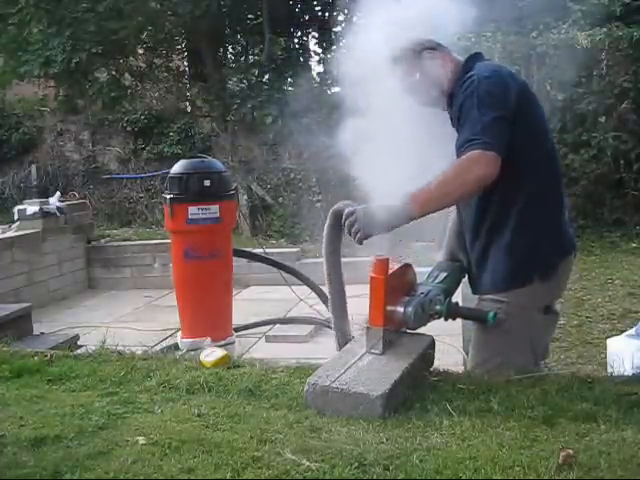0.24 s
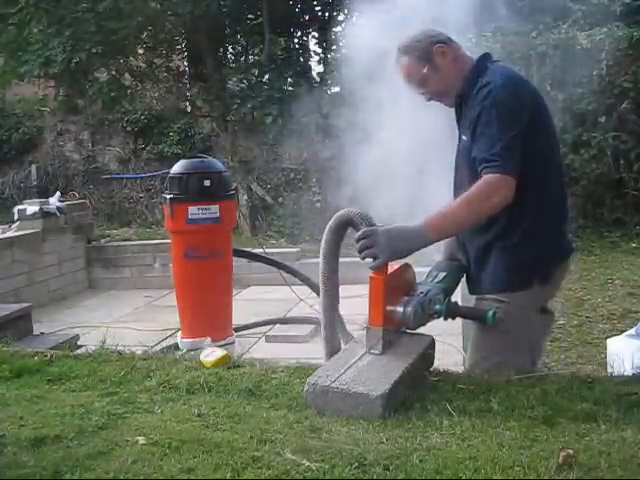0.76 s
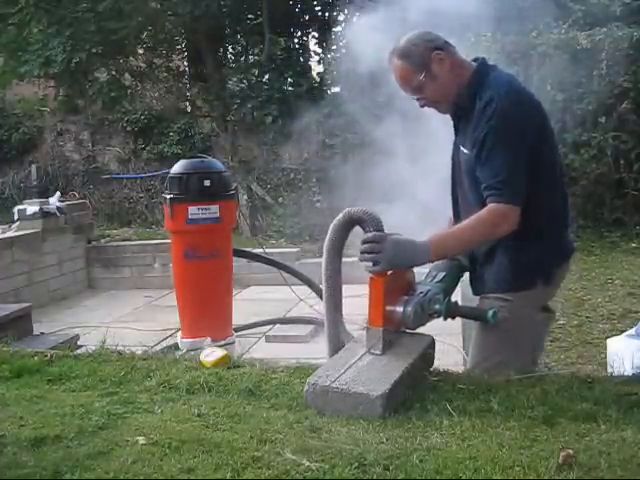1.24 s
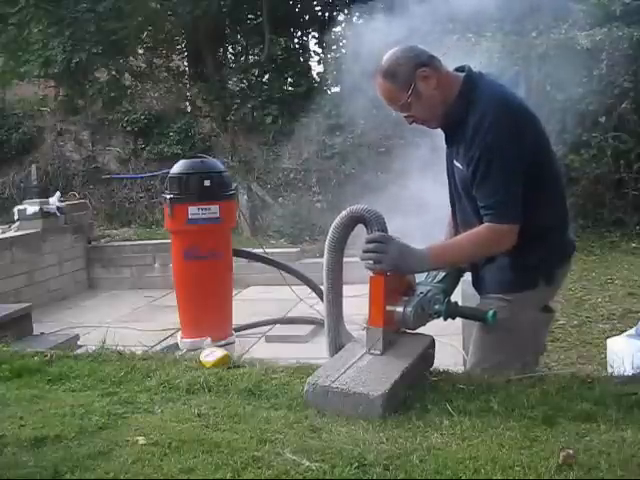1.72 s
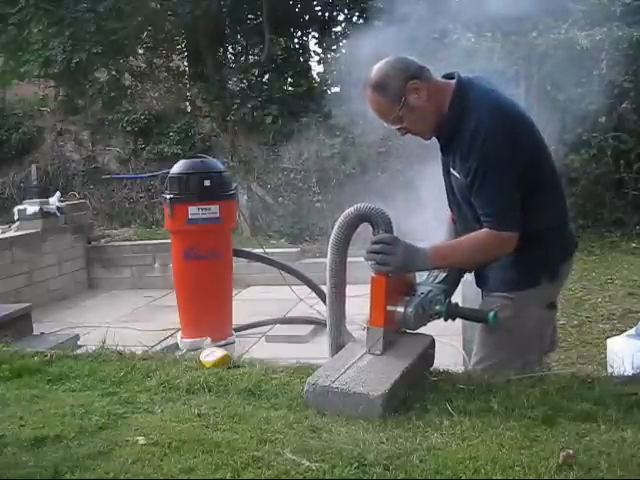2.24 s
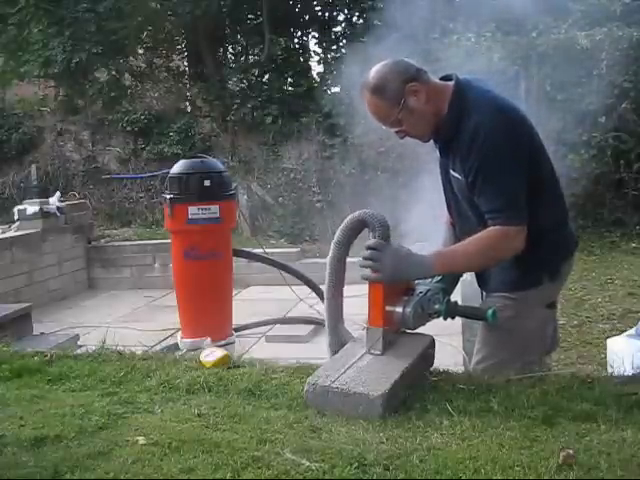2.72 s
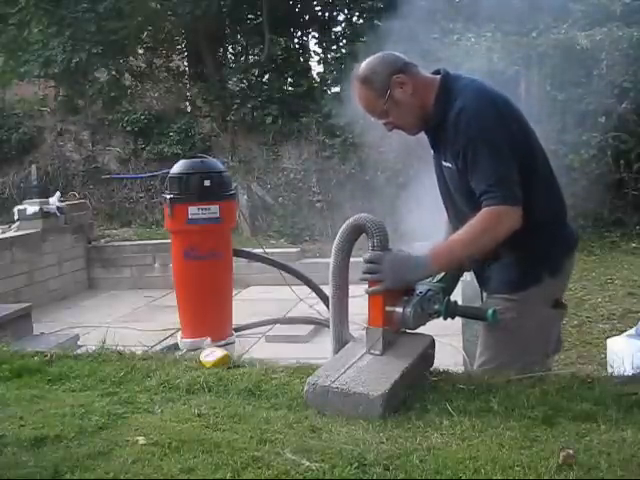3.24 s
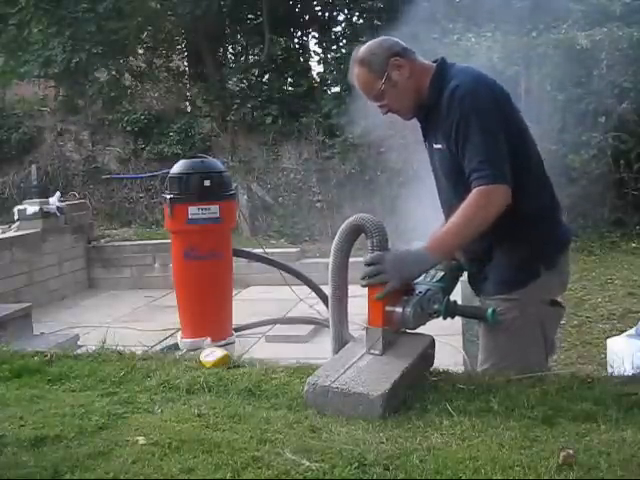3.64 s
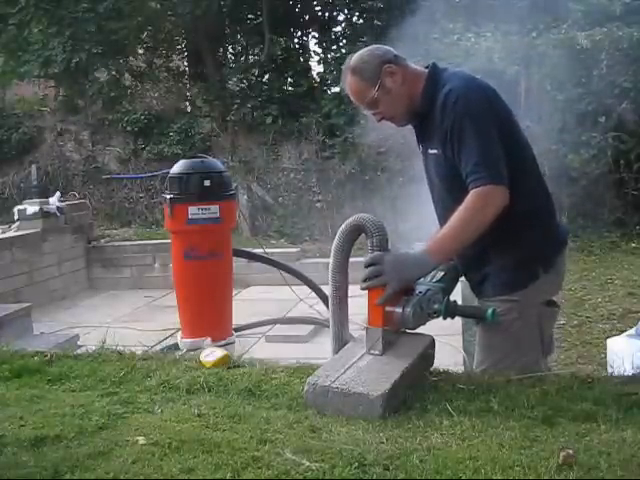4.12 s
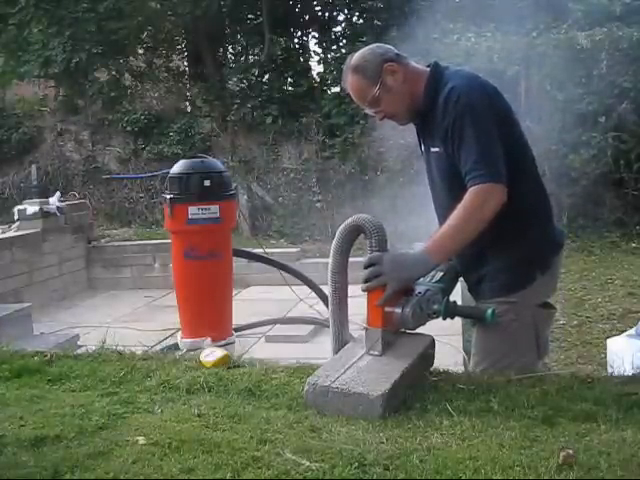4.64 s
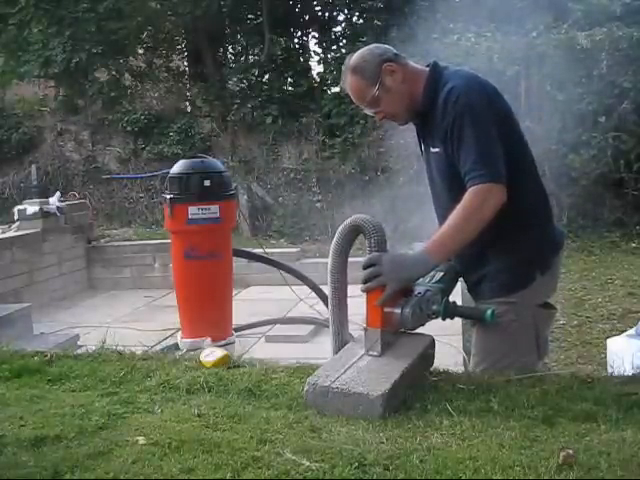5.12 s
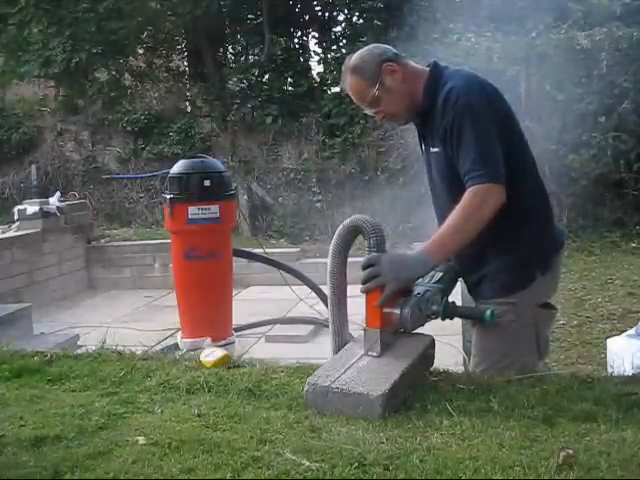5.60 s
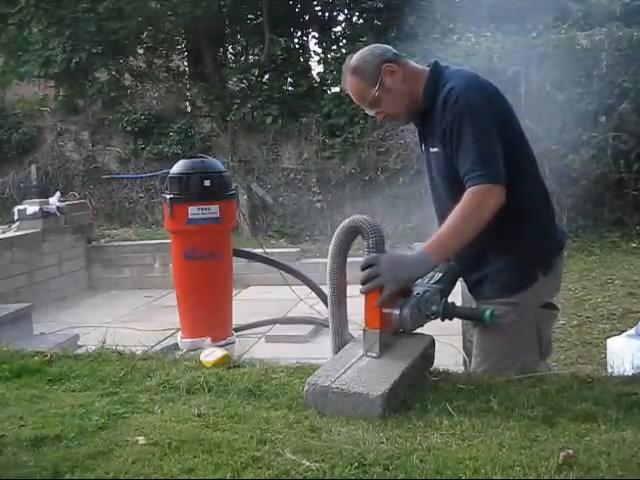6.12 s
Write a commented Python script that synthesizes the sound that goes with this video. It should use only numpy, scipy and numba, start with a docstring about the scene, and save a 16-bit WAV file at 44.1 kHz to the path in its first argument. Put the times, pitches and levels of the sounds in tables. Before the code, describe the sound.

Steady, piercing abrasive grinding of a diamond disc in concrete, with ringing steel, a climbing then sagging motor pitch and faint extractor air rush.

```python
"""In a garden, an angle grinder with a diamond blade cuts a concrete block, a dust extractor on its guard.
Filtered noise is the scraped grit; noise-driven resonators are the steel disc, whose modes shift as the
motor gains speed and bogs down again, and three of them squeal. Sines on one shaft make the motor's hum,
fan tone and whine. Air rushes through the guard while the hose is pushed on; a faint rumble lies below.
One mono camera microphone hears it all."""
import sys
import numpy as np
from scipy import signal
from scipy.fft import rfft, irfft, next_fast_len
from scipy.io import wavfile
from scipy.ndimage import uniform_filter1d
from numba import njit

SR = 44100
rng = np.random.default_rng(int(sys.argv[2]) if len(sys.argv) > 2 else 0)


def wav_record(signal):
    """Record a signal, one row per channel, as 16-bit PCM in the file named by sys.argv[1]."""
    frames = np.transpose(np.atleast_2d(signal))
    bounded = np.clip(frames, -1, 1)
    # unit amplitude maps onto the largest positive 16-bit level
    quanta = np.round(bounded * 32767).astype(np.int16)
    wavfile.write(sys.argv[1], SR, quanta)


N = 280476

# disc modes; waves running with the spin rise, those against it fall: full_speed_hz,
# shift_hz_per_motor_hz, width_hz (before the damping factor), full_speed_db, labouring_db
DISC_MODES = [(2610, .8, 50, -41, -41), (2860, .5, 26, -38, -40), (2995, .1, 150, -35, -33),
              (3285, 1.5, 22, -41, -43), (3620, 1.1, 90, -34.5, -36), (3866, 1.5, 24, -39.5, -38),
              (4318, .6, 95, -31, -32), (4567, 1.9, 20, -37, -39), (4680, .3, 35, -39, -41),
              (4875, .6, 28, -42, -44), (5700, .6, 50, -43, -41), (5840, 1.6, 28, -40, -37),
              (6326, 1.4, 30, -38, -38), (6490, 2, 24, -46, -40), (7350, 2.6, 28, -44, -41),
              (8729, .8, 390, -37, -38), (9314, 2.1, 45, -41, -37), (9640, -2, 45, -40, -39),
              (9910, 2.5, 40, -38, -36), (10776, 1, 50, -38, -42), (11190, 3.2, 80, -39, -37),
              (11822, -1.9, 50, -41, -38), (12132, -2.9, 300, -39, -35), (12823, 1.9, 30, -45, -42),
              (13122, .1, 45, -41, -52), (13553, .8, 370, -35, -36), (14515, 1.7, 40, -41, -35),
              (14897, -2, 80, -38, -41), (15211, 2, 80, -40, -37)]
# the three disc modes that the cut pumps hardest: full_speed_hz, shift_hz_per_motor_hz, width_hz
SQUEALING_MODES = [(5068, 1.4, 24), (5257, 1.3, 20), (6160, 1.1, 22)]
# strength of those modes, before SQUEAL_OFFSET_DB: level_db, extra_db while the disc rubs,
# extra_db while the dust port is open, slope_db_per_s
SQUEAL_STRENGTHS = [(-32.5, 5, -10, -0.74), (-37, 2, 5, 0), (-31.5, 1, 1, 0.07)]
SQUEAL_OFFSET_DB = -1.5
# the blade catches in the slot and the squeal changes: peak_s, lower_pair_change_db, upper_mode_change_db
BLADE_CATCHES = [(.06, 8, -1), (.94, -2, 3.5), (1.17, 2, 5), (2.27, 4, 1.5), (2.37, 5.5, 2), (2.58, 5, 6.5),
                 (4.08, 5.5, 1), (4.6, -3, 7), (5.109, -1, 7.5), (5.35, 3, 2)]
CATCH_HALF_S = .04  # from the peak to 1/e of it
# the side of the disc rubs the slot wall through the middle of the cut
RUB_FROM_S, RUB_TO_S, RUB_FADE_S = 1.67, 4.5, .35

# level of the coarse scraping: time_s, level_db (before COARSE_OFFSET_DB)
SCRAPING_LEVEL = [(0, -25), (0.65, -22), (1.3, -29), (1.75, -26.5), (3.05, -28.5), (3.35, -24),
                  (4.4, -25.5), (4.85, -27.0), (6.35, -26.5)]
COARSE_OFFSET_DB = -7
# spectra of crushed concrete, coarse and fine: frequency_hz, relative_db
COARSE_SPECTRUM = [(150, -59), (700, -51), (1000, -12.5), (1330, -17), (1500, -6), (1850, -10), (2200, -2),
                   (2700, -4), (3300, -7.5), (4700, -10.5), (5450, -18), (7000, -25)]
FINE_SPECTRUM = [(1000, -53), (4500, 6), (5600, 1), (6600, 5), (7400, 2.5), (8500, 1), (10200, 0),
                 (13000, 2.5), (15400, 1.5)]
FINE_DB, FINE_LOAD_DB = -25.5, -0.1  # the fine hiss falls very slightly under load
# reflections off the garden walls: delay_s, level_db
WALL_ECHOES = [(.0137, -15), (.0262, -15), (.0411, -17)]

# the motor picks up, runs free and bogs down: time_s, speed_hz, once_a_turn_hum_db
MOTOR_COURSE = [(0, 266, -76), (0.3, 283.8, -63), (0.6, 294.3, -59), (0.95, 306, -51), (1.17, 314.1, -70),
                (1.5, 323.2, -65.2), (2, 330.5, -60), (2.5, 336.6, -57), (3.5, 340.4, -53),
                (4.5, 333, -57.5), (4.85, 311.9, -55), (5.2, 298, -53.8), (5.6, 286.5, -55.1),
                (6.36, 277.3, -61.5)]
FULL_HZ, SAG_HZ = 340, 60  # free motor speed, and its fall at load 1
FAN_BLADES, BLADE_SEGMENTS = 11, 16
GEAR_RATIO = 4.09  # motor turns per blade turn
# the cooling fan sings while the motor picks up
FAN_DB, FAN_SWELL_DB, FAN_PEAK_S, FAN_SWELL_S = -48, 7, 1.1, 0.68
# the whine flares as the blade binds in the slot and drags the motor down
WHINE_DB, BIND_DB, BIND_PEAK_S, BIND_SWELL_S = -56, 15, 5.21, .4

# fixed resonances of the dust guard: frequency_hz, width_hz, level_db (before the stirring gain)
GUARD_MODES = [(1622, 75, -40), (2060, 120, -42), (2300, 120, -41)]
GUARD_DB, GUARD_DB_PER_S = 0.5, -0.5  # the ring fades as the blade sinks into the slot
# the guard's lowest resonance rises and falls in level: time_s, level_db
HOWL_LEVEL = [(0, -55), (.4, -41.5), (1.1, -47), (2.3, -50), (3.8, -42), (4.6, -45.5), (5.2, -48.5),
              (6.36, -46)]
HOWL_HZ, HOWL_WIDTH_HZ = 1190, 45

# air drawn through the guard: frequency_hz, relative_db
AIR_SPECTRUM = [(40, -42), (120, -22.5), (190, -14.5), (250, -16), (310, -4), (400, -2.5), (600, 0),
                (700, 3), (830, 0), (1000, 0.5), (1300, -11.5), (2500, -16.5)]
AIR_DB, AIR_DB_PER_S = -46, -.45  # the rush fades as the blade sinks into the slot
# resonances of the hose mouth: frequency_hz, width_hz, relative_db
HOSE_MODES = [(298, 16, -6), (385, 34, -3), (440, 25, -6), (535, 18, -2), (690, 20, -6), (925, 34, 2)]
HOOT_DB, HOOT_DB_PER_S = -53.5, -0.4
# the hose hoots as it nears the open port: extra level, and how long the approach lasts
OPEN_HOOT_DB, APPROACH_S = 7, .9
# the hose is pushed onto the guard: when, and how long it takes to seal
SEATED_S, SEAL_S = 1.11, 0.087

# faint outdoor rumble: frequency_hz, relative_db
RUMBLE_SPECTRUM = [(25, 2.5), (50, 1), (78, 2), (110, 0.5), (220, 1), (800, -25)]
NOTCH_HZ, TOP_HZ = 7880, 15420  # the camera's treble notch and upper limit


def undb(db):
    """Level to amplitude: 20 dB is a factor of ten."""
    return 10 ** (np.asarray(db) / 20)


def unit(x):
    """Normalization to rms 1."""
    return x / np.sqrt(np.mean(x ** 2))


def seconds():
    """Sampling: the time of each sample."""
    return np.arange(N) / SR


def curves(table):
    """Linear interpolation of each column of a time table."""
    s, *columns = np.transpose(table)
    return [np.interp(seconds(), s, c) for c in columns]


def swell(peak_s, half_s):
    """Gaussian envelope: a bell-shaped rise and fall, 0 to 1."""
    return np.exp(-((seconds() - peak_s) / half_s) ** 2)


def noise():
    """White noise: equal power at every frequency."""
    return rng.standard_normal(N)


def walk(rate):
    """Random modulation: straight lines join `rate` random values a second, spread near 1."""
    knots = rng.standard_normal(1024)
    return 1.2 * np.interp(seconds() * rate, np.arange(len(knots)), knots)


def colour(x, spectrum):
    """Spectral filtering by a frequency-to-level curve; rms 1."""
    hz, db = np.transpose(spectrum)
    size = next_fast_len(N)
    f = np.maximum(np.arange(size // 2 + 1) * SR / size, 1)
    gain = undb(np.interp(np.log(f), np.log(hz), db))
    return unit(irfft(rfft(x, size) * gain, size)[:N])


@njit
def resonator(x, hz, width):
    """Damped oscillation of a mode whose pitch may move; read as velocity, so it has no bass."""
    y, state, step = np.empty(len(x)), 0j, 0j
    for i in range(len(x)):
        if i % 16 == 0:
            step = np.exp((2j * hz[i] - width) * np.pi / SR)
        state = state * step + x[i]
        y[i] = state.real - x[i] / 2
    return y


def ring(drive, hz, width):
    """Forced resonance: a random force of its own, of the given strength, shakes one mode; rms 1."""
    force = drive * rng.uniform(-1, 1, N)
    return unit(resonator(force, hz + np.zeros(N), float(abs(width))))


def cavity(modes, drive):
    """Cavity resonance: grit or air stirs a set of fixed modes."""
    return sum(undb(db) * ring(drive, hz, width) for hz, width, db in modes)


def load(speed):
    """Speed sag under torque: 0 when the motor runs free, 1 when it is SAG_HZ slower."""
    return (FULL_HZ - speed) / SAG_HZ


def contact(speed, wobble=0.08, chatter_db=.5):
    """Contact force: the blade presses harder once a turn and chatters in the slot."""
    turn = 2 * np.pi * np.cumsum(speed / GEAR_RATIO) / SR
    return (1 + wobble * np.sin(turn)) * undb(chatter_db * walk(35))


def disc(speed, press, flicker_db=1.0, damping=0.81):
    """Rotating-plate vibration: modes follow the spin, and trade strength as the load changes."""
    sag_hz = FULL_HZ - speed
    out = 0
    for hz, slope, width, free_db, loaded_db in DISC_MODES:
        db = free_db + (loaded_db - free_db) * load(speed) + flicker_db * walk(12)
        out = out + undb(db) * ring(press, hz - slope * sag_hz, damping * width)
    return out


def rubbing():
    """Side friction: 1 while the disc rubs the slot wall, else 0, with short fades."""
    t = seconds()
    return np.clip(.5 + np.minimum(t - RUB_FROM_S, RUB_TO_S - t) / RUB_FADE_S, 0, 1)


def port_open():
    """Port closure: 1 while the guard's dust port is open, 0 once the hose is seated."""
    return np.clip(.5 + (SEATED_S - seconds()) / SEAL_S, 0, 1)


def squeal(speed, press, saturation=0.52, flicker_db=2.5):
    """Friction-driven oscillation: three pumped modes, partly limited in swing, flicker and change at catches."""
    pair_db = sum(db * swell(s, CATCH_HALF_S) for s, db, _ in BLADE_CATCHES)
    upper_db = sum(db * swell(s, CATCH_HALF_S) for s, _, db in BLADE_CATCHES)
    catches_db = (pair_db, pair_db, upper_db)
    out = 0
    for mode, strength, catch_db in zip(SQUEALING_MODES, SQUEAL_STRENGTHS, catches_db):
        hz, slope, width = mode
        db, rub_db, open_db, db_per_s = strength
        tone = ring(press, hz - slope * (FULL_HZ - speed), width)
        swing = np.sqrt(uniform_filter1d(tone ** 2, size=1600) + 1e-6)  # local rms over 36 ms
        limited = unit(tone / swing ** saturation)
        slow_db = db + rub_db * rubbing() + open_db * port_open() + db_per_s * seconds()
        out = out + limited * undb(slow_db + catch_db + flicker_db * walk(18) + SQUEAL_OFFSET_DB)
    return out


def grit(press, spectrum, grain_db=3):
    """Brittle fracture: countless grains of uneven size break off under the diamonds."""
    grains = noise() * undb(grain_db * rng.standard_normal(N))
    return colour(press * grains, spectrum)


def concrete(speed, press, coarse_flicker_db=1.0, fine_flicker_db=0.66):
    """Abrasion noise: coarse scraping varies in level; the fine hiss is nearly steady."""
    scraping_db, = curves(SCRAPING_LEVEL)
    coarse_db = scraping_db + COARSE_OFFSET_DB + coarse_flicker_db * walk(16)
    fine_db = FINE_DB + FINE_LOAD_DB * load(speed) + fine_flicker_db * walk(40)
    coarse = grit(press, COARSE_SPECTRUM) * undb(coarse_db)
    return coarse + grit(press, FINE_SPECTRUM) * undb(fine_db)


def garden(x):
    """Reflection and interference: a few hard surfaces throw the noise back and ripple its spectrum."""
    return x + sum(undb(db) * np.pad(x, (int(s * SR), 0))[:N] for s, db in WALL_ECHOES)


def motor(speed, jitter=0.0028, rough_db=1.0):
    """Rotating sources: rotor imbalance hums, blade segments whine and the fan sings on one unsteady shaft."""
    _, imbalance_db = curves(MOTOR_COURSE)
    fan_db = FAN_DB + FAN_SWELL_DB * swell(FAN_PEAK_S, FAN_SWELL_S)
    whine_db = WHINE_DB + BIND_DB * swell(BIND_PEAK_S, BIND_SWELL_S)
    angle = 2 * np.pi * np.cumsum(speed * (1 + jitter * walk(60))) / SR
    rattle = undb(2 * walk(90))
    hum = np.sin(angle) * undb(imbalance_db + rough_db * walk(25))
    whine = np.sin(BLADE_SEGMENTS / GEAR_RATIO * angle) * undb(whine_db)
    fan = np.sin(FAN_BLADES * angle) * undb(fan_db)
    return np.sqrt(2) * (hum + (whine + fan) * rattle)  # levels are rms


def guard(speed, press, spin_db=4):
    """Cavity excitation: flying grit and air stir the space around the blade, harder as it spins faster."""
    howl_db, = curves(HOWL_LEVEL)
    faster = (speed - speed.mean()) / SAG_HZ
    stir = undb(GUARD_DB + GUARD_DB_PER_S * seconds() + spin_db * faster)
    howl = ring(press, HOWL_HZ, HOWL_WIDTH_HZ) * undb(howl_db)
    return cavity(GUARD_MODES, press) * stir + howl


def extractor(gust_db=1.0):
    """Turbulence and pipe resonance: air rushes, and the hose mouth's hoot swells until it is seated."""
    rush_db = AIR_DB + AIR_DB_PER_S * seconds() + gust_db * walk(8)
    rush = colour(noise(), AIR_SPECTRUM) * undb(rush_db)
    approach = port_open() * swell(SEATED_S, APPROACH_S)
    hoot_db = HOOT_DB + HOOT_DB_PER_S * seconds() + OPEN_HOOT_DB * approach
    return rush + unit(cavity(HOSE_MODES, 1)) * undb(hoot_db)


def outdoors(db=-73):
    """Ambient noise: a faint rumble comes and goes."""
    return colour(noise(), RUMBLE_SPECTRUM) * undb(db + 3.5 * walk(12))


def scene(disc_db=-0.46, bite_db=0.5):
    """Superposition of the cut, motor and extractor in open air; the blade bites unevenly."""
    speed = curves(MOTOR_COURSE)[0]
    press = contact(speed)
    bite = undb(bite_db * walk(22))
    steel = (disc(speed, press) * undb(disc_db) + squeal(speed, press)) * bite
    cut = steel + garden(concrete(speed, press))
    machine = motor(speed) + guard(speed, press) + extractor()
    return np.tile(cut + machine + outdoors(), (2, 1))  # the same sound in both channels


def record(dry, notch_width_hz=330):
    """Band limiting: the camera filters out a narrow treble band and cuts the top."""
    b, a = signal.iirnotch(NOTCH_HZ, NOTCH_HZ / notch_width_hz, fs=SR)
    for _ in range(3):
        dry = signal.lfilter(b, a, dry)
    return signal.sosfilt(signal.ellip(16, .1, 80, TOP_HZ, fs=SR, output="sos"), dry)


dry = scene()
out = record(dry)
wav_record(out)
```